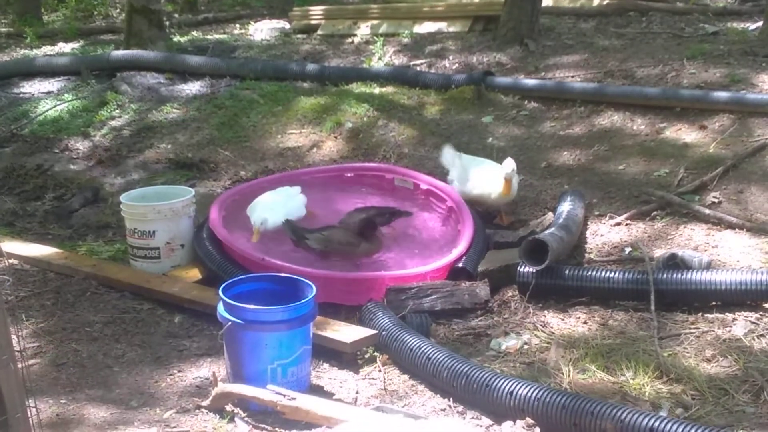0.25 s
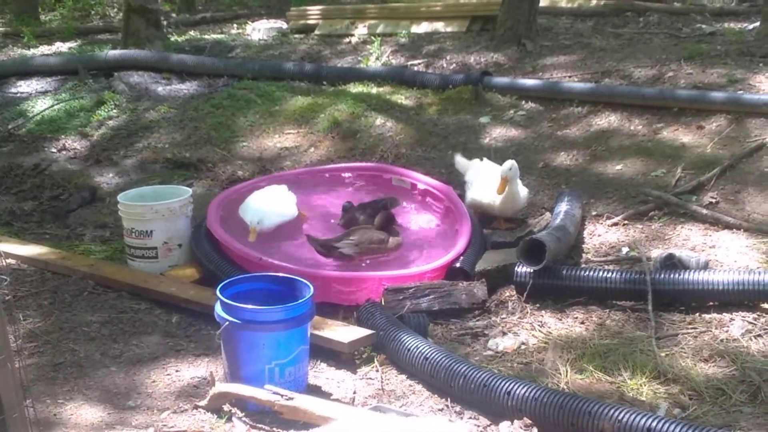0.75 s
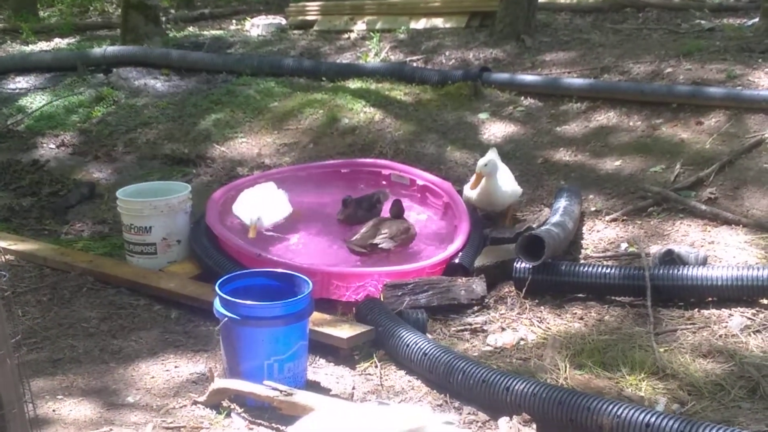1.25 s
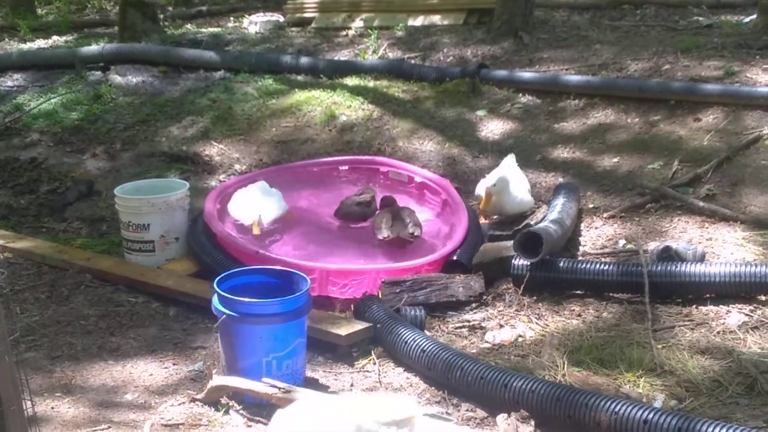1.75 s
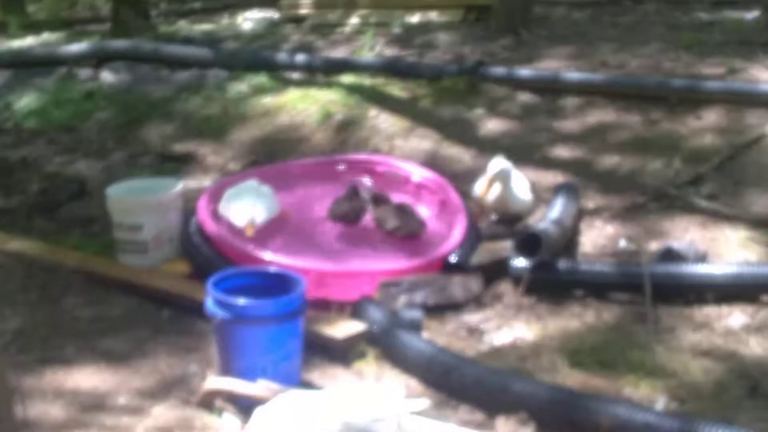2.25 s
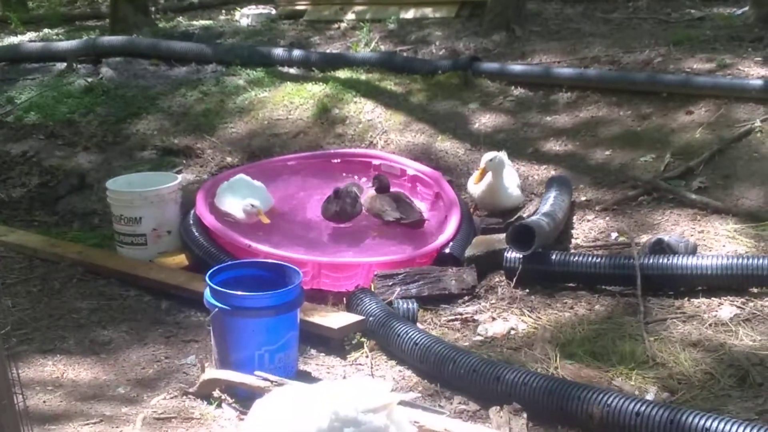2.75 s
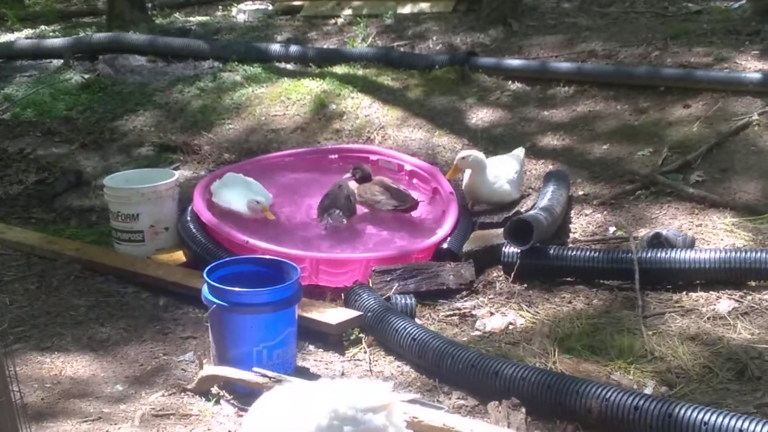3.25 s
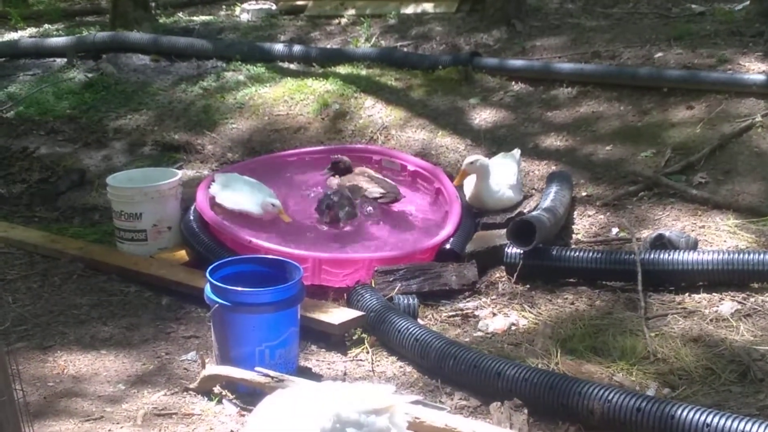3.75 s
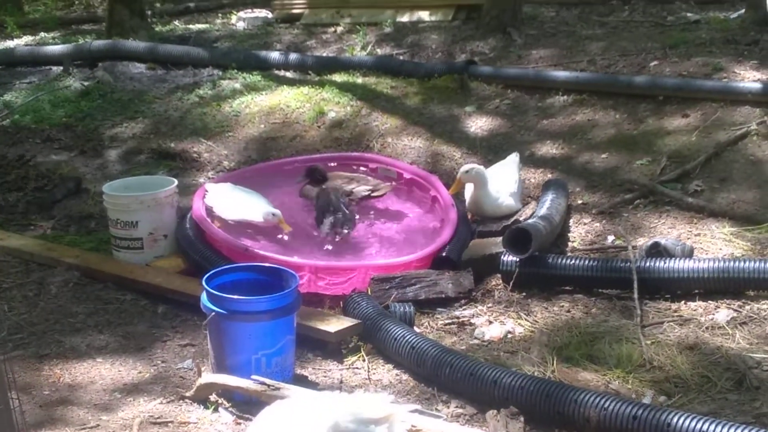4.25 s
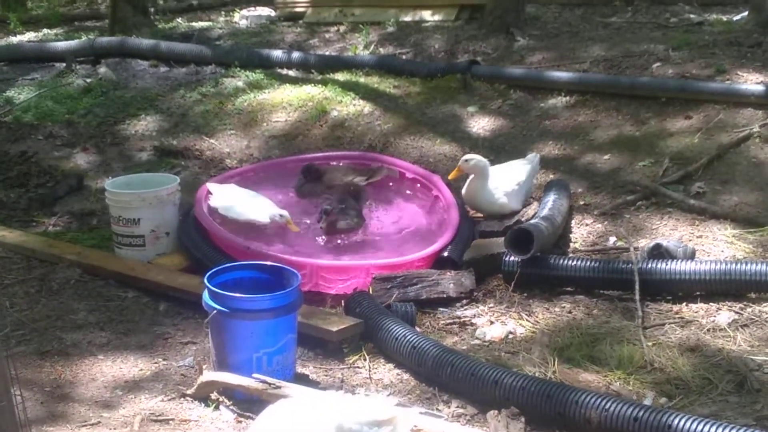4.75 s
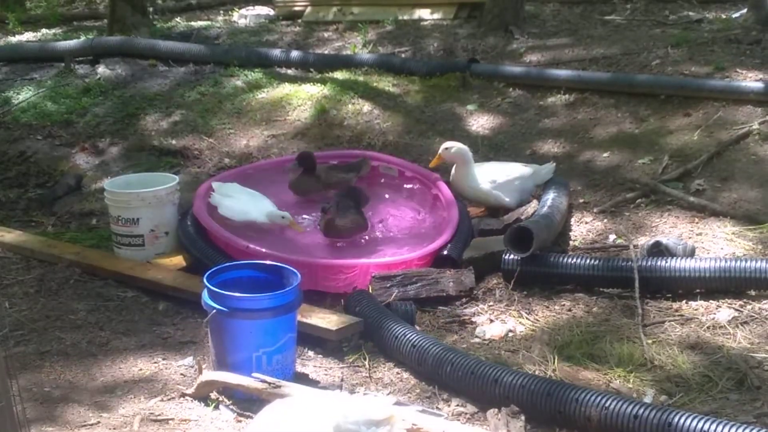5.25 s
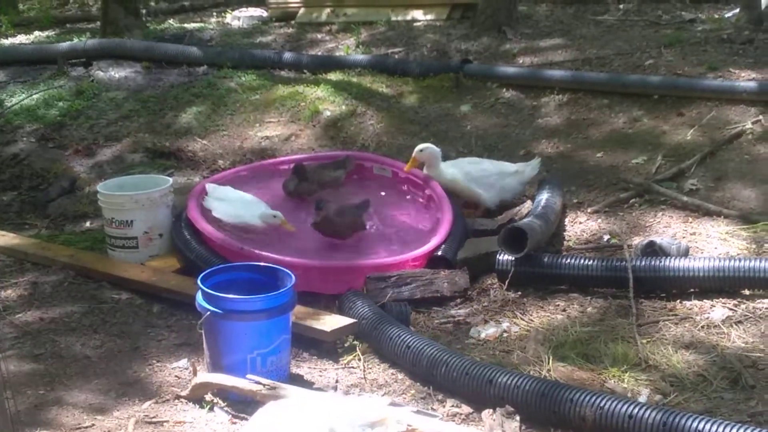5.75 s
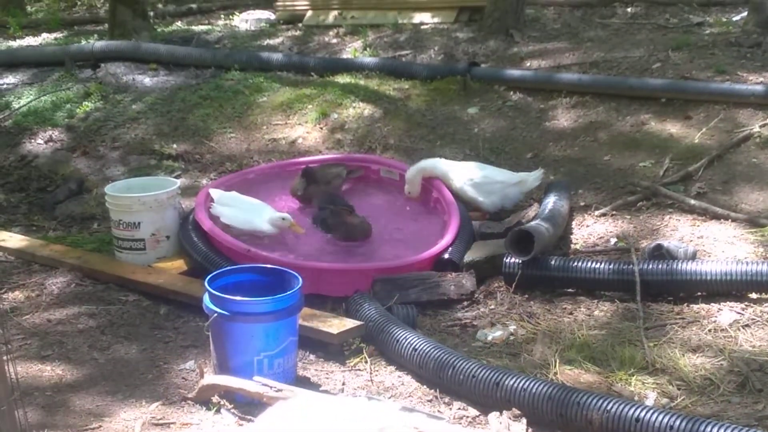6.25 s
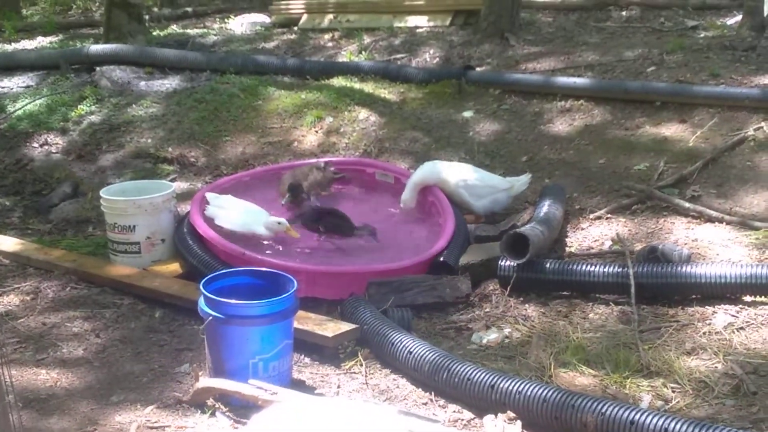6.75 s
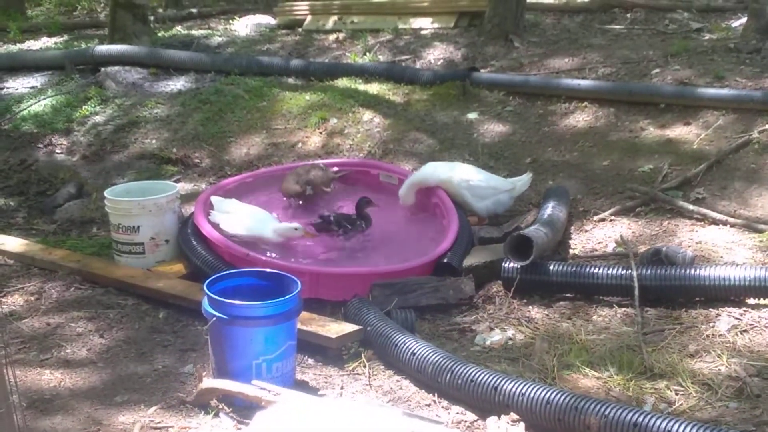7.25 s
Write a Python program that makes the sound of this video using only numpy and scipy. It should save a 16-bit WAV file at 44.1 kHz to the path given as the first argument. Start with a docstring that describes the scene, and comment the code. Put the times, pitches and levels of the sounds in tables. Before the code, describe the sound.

Ducks dabble and splash in a plastic pool outdoors while a bird gives two sharp, split-second yelps among soft trills, clucks and coos.

```python
"""Chicken and ducks in a shady pen

A chicken gives two sharp two-voiced yelps amid soft trills, squeaks, coos and clucks: pitch curves and
pulses through coloured filters. Ducks dabble in a plastic pool, flicking drops (rising bubbles, sprayed
noise) and bumping it once (damped modes). Ground, pen and trees return a faint echo; one far peep, dull
thuds, lapping and noise lie behind. The stereo microphone turns the phase between its channels with frequency."""
import sys
import numpy as np
from scipy import signal
from scipy.fft import rfft, irfft, next_fast_len
from scipy.io import wavfile
from scipy.ndimage import uniform_filter1d, map_coordinates

SR = 44100
rng = np.random.default_rng(int(sys.argv[2]) if len(sys.argv) > 2 else 0)


def file_out(sig):
    """Save sig as 16-bit WAV at sys.argv[1]."""
    # one column per channel
    cols = np.atleast_2d(sig).T
    # limit, then scale
    lim = np.clip(cols, -1, 1)
    pcm = np.round(lim * 32767).astype(np.int16)
    wavfile.write(sys.argv[1], SR, pcm)


N = 331632


def amp(db):
    """Decibels to gain."""
    return 10 ** (np.asarray(db) / 20)


def unit(x):
    """Scale to rms 1."""
    return x / np.sqrt(np.mean(x ** 2) + 1e-20)


def along(points, hz):
    """Interpolate (frequency, value) points on a log frequency axis."""
    point_hz, value = np.transpose(points)
    return np.interp(np.log(hz + 1), np.log(point_hz + 1), value)


def times(length_s):
    """Sample times of a span."""
    return np.arange(int(length_s * SR)) / SR


def cycle(hz):
    """Running phase of a pitch curve, in radians."""
    return 2 * np.pi * np.cumsum(hz) / SR


def add(track, start_s, x):
    """Mix x into the track from start_s."""
    room = track[..., max(round(start_s * SR), 0):][..., :x.shape[-1]]
    room += x[..., :room.shape[-1]]


def wobble(knots_per_s, size=N):
    """Smooth random curve through normally distributed knots."""
    knots = rng.standard_normal(int(size * knots_per_s / SR) + 4)
    return map_coordinates(knots, [np.arange(size) * knots_per_s / SR])


def filtered(x, response):
    """x times a complex response of frequency."""
    n = x.shape[-1]
    m = next_fast_len(n + 4096)
    return irfft(rfft(x, m) * response(np.fft.rfftfreq(m, 1 / SR)), m)[..., :n]


def coloured(x, spectrum):
    """x with a (frequency [Hz], level [dB]) colour, at rms 1."""
    return unit(filtered(x, lambda hz: amp(along(spectrum, hz))))


def resonate(x, spectrum, size=1024):
    """x through a causal, minimum-phase filter of the given (frequency [Hz], gain [dB]) colour."""
    cepstrum = irfft(np.log(amp(along(spectrum, np.fft.rfftfreq(size, 1 / SR)))))
    # fold onto positive time
    cepstrum[1:size // 2] *= 2
    cepstrum[size // 2 + 1:] = 0
    return signal.fftconvolve(x, irfft(np.exp(rfft(cepstrum))))


def patchy(depth_db):
    """Noise whose level varies in patches of time and frequency."""
    z = signal.stft(rng.standard_normal(N), nperseg=512)[2]
    field = uniform_filter1d(rng.standard_normal(z.shape), size=6, axis=0)
    field = uniform_filter1d(field, size=7, axis=1)
    return signal.istft(z * amp(depth_db * unit(field)), nperseg=512)[1][:N]


# Yelps: (break time [s], low voice [Hz], low voice level [dB], high voice level before, after break [dB],
# high voice left-right before, after break [dB])
YELP_EVENTS = [(2.2626, 871, -34.5, -16, -23.5, 6.5, -0.5), (4.7166, 884, -26, -33, -23, 3, 2)]
# Yelp gesture: (time from break [s], high voice [Hz], low voice level [dB], high voice level [dB])
YELP_GESTURE = [(-.028, 1310, -31, -48), (-.0235, 1422, -8, -29), (-.017, 1472, -22, -7.5),
                (-.011, 1583, -2.5, 0), (-.0045, 1686, -0.5, 1), (-.0005, 1830, -3, -15),
                (.0012, 2880, -7.5, -6), (.004, 3023, -23, -2), (.008, 3540, -24, -9),
                (.020, 3780, -46, -22)]
# Low voice overtones: (multiple, level [dB])
LOW_VOICE_OVERTONES = [(1, 3), (2, -1.5), (3, -15.5), (4, -5), (5, -27), (6, -27.5), (8, -18), (10, -25)]
# Yelp colour: (frequency [Hz], gain [dB])
YELP_COLOUR = [(300, -7), (700, -12), (900, -2), (1200, 4.5), (1600, -4), (1850, -5.5), (2150, 15.5),
               (2550, 5), (3050, 2.5), (3650, -9.5), (4300, 5), (5500, -24.5), (7000, -27.5), (12000, -22)]


def yelps(rough=0.11, coupling=0.17, jitter=0.048):
    """Each side of the syrinx has its own voice: one holds a low note, the other shoots upward."""
    out = np.zeros((2, N))
    when_s, *curves = np.transpose(YELP_GESTURE)
    t = when_s[0] + times(when_s[-1] - when_s[0])
    high_hz, low_swell_db, high_swell_db = [np.interp(t, when_s, c) for c in curves]
    for break_s, low_hz, level_db, before_db, after_db, pan_before_db, pan_after_db in YELP_EVENTS:
        low_gain = amp(level_db + low_swell_db)
        high_gain = amp(np.where(t < 0, before_db, after_db) + high_swell_db)
        pan_db = np.where(t < 0, pan_before_db, pan_after_db)
        low_phase = cycle(low_hz * (1 + jitter * wobble(947, len(t))))
        high_phase = cycle(high_hz * (1 + 0.014 * wobble(790, len(t))))

        low = np.zeros(len(t))
        for k, db in LOW_VOICE_OVERTONES:
            low += amp(db) * np.sin(k * low_phase) * (1 + rough * wobble(891, len(t)))
        low *= low_gain

        # shared airflow: the low voice modulates the high one and gates the rasp
        high = np.sin(high_phase) + amp(-23) * np.sin(2 * high_phase)
        high *= high_gain * (1 + coupling * np.sin(low_phase))
        air_spectrum = [(500, -24), (1500, 0.5), (4000, -6), (6000, 2), (12000, -23)]
        air = coloured(rng.standard_normal(len(t)), air_spectrum)
        rasp = amp(-16) * (low_gain + 0.25 * high_gain) * (1 + np.sin(low_phase)) * air

        voice = low + rasp + high * amp(np.outer([0.5, -0.5], pan_db))
        voice = np.array([resonate(side, YELP_COLOUR) for side in voice])
        add(out, break_s + when_s[0], np.sqrt(2) * voice)
    return out


def whistle(pitch_hz, overtone_db=-21, shimmer=0.31, jitter=0.025,
            flare_hz=1620, width_hz=240, boost_db=6, fade_s=0.0036):
    """Slightly hoarse tone of rms 1 that flares as its pitch sweeps through flare_hz."""
    n = len(pitch_hz)
    phase = cycle(pitch_hz * (1 + jitter * wobble(386, n)))
    flare = amp(boost_db * np.exp(-((pitch_hz - flare_hz) / width_hz) ** 2))
    fade = signal.windows.tukey(n, 2 * fade_s * SR / n)
    swell = flare * fade * (1 + shimmer * wobble(295, n))
    return unit(swell * (np.sin(phase) + amp(overtone_db) * np.sin(2 * phase)))


# Trills: (time of first flick's top [s], flicks, flick period [s],
# opening level [dB], closing level [dB], rasp level [dB]); levels before gains
TRILL_EVENTS = [(.726, 3, 0.056, -57, -51, -61), (1.515, 4, 0.052, -58, -45.5, -58.5),
                (2.763, 3, 0.055, -57, -56, -55), (3.592, 3, 0.053, -45.5, -47, -51.5),
                (5.200, 3, .052, -56, -51, -54), (6.115, 3, 0.052, -59, -51, -54.5)]
TRILL_HZ, FLICK_HZ, FLICK_SHARPNESS = 1307, 2450, 3  # held note, top of a flick, exponent
LEAD_S, TAIL_S = 0.078, 0.021  # before the first flick's top, after the last


def trills(gain_db=-1, flick_db=-4, fall_db=-12):
    """A held note breaks into evenly spaced upward flicks; the level dips at the top of each flick."""
    out = np.zeros(N)
    for flick_s, flicks, period_s, open_db, close_db, _ in TRILL_EVENTS:
        t = times(LEAD_S + (round(flicks) - 1) * period_s + TAIL_S) - LEAD_S
        turn = np.maximum(t / period_s, -0.5) % 1
        lift = np.abs(2 * turn - 1) ** FLICK_SHARPNESS
        db = gain_db + np.linspace(open_db, close_db, len(t)) + flick_db * lift
        db += fall_db * np.clip(1 - (t[-1] - t) / TAIL_S, 0, 1)
        pitch_hz = TRILL_HZ + (FLICK_HZ - TRILL_HZ) * lift
        add(out, flick_s - LEAD_S, amp(db) * whistle(pitch_hz))
    return out


# Squeaks: (time [s], length [s], start [Hz], end [Hz], level before gain_db [dB])
SQUEAK_EVENTS = [(1.415, 0.017, 1330, 850, -54.5), (2.16, 0.025, 1120, 694, -49.5),
                 (2.906, 0.013, 1280, 740, -53.5), (3.92, 0.011, 1365, 850, -54),
                 (4.888, 0.0074, 1470, 2660, -43), (4.978, 0.0065, 1150, 1750, -47.5),
                 (5.148, .024, 1380, 3290, -46.5), (6.164, 0.0087, 1450, 1720, -42.5),
                 (6.442, 0.018, 1530, 2090, -44)]


def squeaks(gain_db=-2.5):
    """Quick straight pitch glides, up or down."""
    out = np.zeros(N)
    for start_s, length_s, start_hz, end_hz, db in SQUEAK_EVENTS:
        pitch_hz = np.linspace(start_hz, end_hz, len(times(length_s)))
        add(out, start_s, amp(db + gain_db) * whistle(pitch_hz))
    return out


# Coos: (time [s], length [s], top pitch [Hz], level before gain_db [dB])
COO_EVENTS = [(1.372, .05, 1730, -59), (2.706, .042, 967, -45), (3.96, 0.065, 944, -46),
              (5.115, .04, 1034, -47.5), (5.132, 0.053, 657, -48.5), (6.185, .055, 872, -49),
              (6.239, 0.092, 789, -54.5), (6.366, 0.036, 752, -57)]


def coos(gain_db=-2.0, droop=0.319, rough=0.052):
    """Low, hoarse notes that arch up to their top pitch and sink again."""
    out = np.zeros(N)
    for start_s, length_s, top_hz, db in COO_EVENTS:
        u = np.linspace(-1, 1, len(times(length_s)))
        tone = whistle(top_hz * (1 - droop * u ** 2), jitter=rough)
        add(out, start_s, amp(db + gain_db) * unit(np.sqrt(1 - u ** 2) * tone))
    return out


# Clucks: (time [s], length [s], chest level [dB], beak level before beak_gain_db [dB])
CLUCK_EVENTS = [(0.556, 0.1, -58, -62), (1.179, 0.027, -53, -57), (1.751, 0.054, -56.5, -53),
                (2.12, .029, -53.5, -49), (2.485, .02, -50.5, -54.5), (2.666, 0.015, -49, -52),
                (2.84, 0.024, -49, -51.5), (3.07, 0.077, -55, -62), (3.489, 0.03, -46.5, -47),
                (3.658, 0.035, -44.5, -43), (3.88, .013, -46, -51.5), (4.435, .015, -48, -52.5),
                (4.534, 0.036, -52.5, -51.5), (4.748, .028, -44.5, -48), (5.008, 0.029, -49.5, -56),
                (5.19, 0.011, -45.5, -48.5), (5.478, .022, -52.5, -53), (5.988, 0.015, -51, -61),
                (6.283, 0.013, -46, -61), (6.331, .02, -45.5, -70), (6.451, 0.028, -51.5, -49),
                (7.081, 0.012, -48.5, -57), (7.434, 0.022, -53, -50.5)]
# Chest cavity: (frequency [Hz], gain [dB])
CHEST_GAIN = [(60, -32), (130, 9.5), (190, 0), (300, 6), (450, -6), (700, -7.5), (1500, -50.5)]
# Beak cavity: (frequency [Hz], gain [dB])
BEAK_GAIN = [(250, -24), (550, -4), (800, 3), (1100, 1.5), (1400, 0), (2000, -14), (3200, -19),
             (5000, -36.5), (10000, -51)]
# Hoarse opening of a trill: start before first flick's top, length, chest against the trill's rasp level
RASP_LEAD_S, RASP_S, RASP_CHEST_DB = 0.072, 0.076, -19
FAINT_CLUCK_S, FAINT_CHEST_DB, FAINT_BEAK_DB = 0.038, -68, -59.5  # rest of the flock


def clucks(pulse_hz=250, jitter=0.192, air=0.1, beak_gain_db=1.0, faint_count=10):
    """Abrupt runs of uneven pulses ring chest and beak: clear clucks, faint ones, the rasps that open trills."""
    out = np.zeros(N)
    rasps = [(flick_s - RASP_LEAD_S, RASP_S, db + RASP_CHEST_DB, db) for flick_s, *_, db in TRILL_EVENTS]
    faint = []
    for k, place in enumerate(rng.random(faint_count)):
        start_s = (k + place) / faint_count * N / SR
        faint.append((start_s, FAINT_CLUCK_S, FAINT_CHEST_DB, FAINT_BEAK_DB))
    for start_s, length_s, chest_db, beak_db in CLUCK_EVENTS + rasps + faint:
        t = times(length_s)
        n = len(t)
        turns = np.cumsum(pulse_hz * np.exp(jitter * wobble(150, n))) / SR
        pulses = np.diff(np.floor(turns + 0.5), prepend=0) * amp(4.1 * wobble(190, n))
        swell = np.minimum(t / 0.0019, 1) * np.minimum(3 * (1 - t / length_s), 1)
        source = (pulses + air * rng.standard_normal(n)) * swell
        for cavity, db in ((CHEST_GAIN, chest_db), (BEAK_GAIN, beak_db + beak_gain_db)):
            ring = resonate(source, cavity)
            add(out, start_s, amp(db) * ring * np.sqrt(n / np.sum(ring ** 2)))
    return out


# Spray colour: (frequency [Hz], level [dB])
SPRAY_SPECTRUM = [(500, -22.5), (2000, 5.5), (3000, 6.5), (3900, 7), (5000, -19.5), (9500, -24),
                  (14000, -44.5)]


def bubble(hz, t60_s, rise_per_s, tick_db=-9):
    """A drop ticks on the surface; the bubble it traps rings and rises in pitch."""
    t = times(0.029)
    pitch_hz = hz * (1 + rise_per_s * (np.minimum(t, 0.012) - 0.003))
    ring = np.sin(cycle(pitch_hz)) * amp(-60 * t / t60_s) * (1 - np.exp(-t / 0.001))
    tick_gain = amp(tick_db - 60 * t / 0.027) * (1 - np.exp(-t / 0.0014))
    return ring + tick_gain * coloured(rng.standard_normal(len(t)), SPRAY_SPECTRUM)


# Loudest drops: (time [s], level before drop_gain_db [dB], bubble pitch 3 ms in [Hz])
DROP_EVENTS = [(1.7913, -47, 3800), (3.3222, -39, 2830), (3.4037, -44.5, 2660), (3.4767, -44, 2870),
               (4.0572, -39, 2480), (4.1702, -43, 3530), (4.194, -46, 3360), (4.31, -44.5, 3540),
               (4.3687, -38.5, 3720), (4.928, -46, 3530), (5.2976, -40.5, 2890), (5.3665, -39.5, 3450),
               (5.386, -41, 2840), (5.474, -43, 3050), (5.5773, -37.5, 3440), (5.7319, -42.5, 2740),
               (6.0015, -50, 2520)]
# Splashes of bills and wings: (time [s], level before attack and decay [dB], t60 [s])
SPLASH_EVENTS = [(0.556, -56, 0.42), (.585, -52, 0.25), (0.756, -50, 0.059), (4.029, -52, 0.044),
                 (4.514, -42, 0.066), (4.888, -47.5, 0.037), (5.017, -43, 0.073), (5.623, -38.5, 0.1),
                 (5.758, -39.5, 0.07), (6.163, -45, 0.071)]
# Stirring of the water: (time [s], slosh level [dB], trickle level [dB]); before gains, also in lapping()
STIRRING = [(0.0, -64.5, -76.5), (0.86, -60.5, -68), (1.34, -59.5, -70), (2.16, -62, -69),
            (2.39, -56, -63.5), (2.68, -56, -63), (3.14, -60, -64), (3.41, -55, -61), (3.56, -54, -61.5),
            (3.77, -55, -63.5), (4.75, -57.5, -62), (4.92, -56, -61.5), (5.95, -57.5, -63.5),
            (6.24, -53.5, -63), (6.47, -57, -65), (7.52, -61.5, -66)]


def water(drop_gain_db=7, drip_count=260):
    """Single drops, many small ones at random times, louder where the water is stirred, and splashed spray."""
    out = np.zeros(N)
    for start_s, db, hz in DROP_EVENTS:
        add(out, start_s, amp(db + drop_gain_db) * bubble(hz, t60_s=0.015, rise_per_s=14))
    for start_s, db, t60_s in SPLASH_EVENTS:
        t = times(0.25)
        noise = rng.standard_normal(len(t)) * amp(5 * wobble(500, len(t)))
        envelope = amp(db - 60 * t / t60_s) * (1 - np.exp(-t / 0.0013))
        add(out, start_s, envelope * coloured(noise, SPRAY_SPECTRUM))
    when_s, _, trickle_db = np.transpose(STIRRING)
    for place, pitch, size in rng.random((drip_count, 3)):
        start_s = place * N / SR
        busy_db = np.interp(start_s, when_s, trickle_db) - trickle_db.max()
        drip_db = busy_db - 60 + 14 * size ** 2
        drip = bubble(2200 + 1500 * pitch, t60_s=0.022, rise_per_s=20)
        add(out, start_s, amp(drip_db) * drip)
    return out


# Knocks of the bump: (time [s], level [dB])
KNOCKS = [(5.629, -33), (5.636, -34.5), (5.676, -42.5)]
# Plastic shell modes: (frequency [Hz], level [dB], t60 [s])
SHELL_MODES = [(188, -11, 0.093), (320, -3, 0.099), (483, -6.5, 0.15), (617, -7, 0.062), (883, -5.5, 0.049),
               (1245, -8.5, 0.027)]


def pool():
    """A duck bumps the plastic shell, whose modes the water damps."""
    out, t = np.zeros(N), times(0.28)
    for start_s, db in KNOCKS:
        ring = np.zeros(len(t))
        for hz, mode_db, t60_s in SHELL_MODES:
            decay = amp(mode_db + rng.normal(0, 1.5) - 60 * t / t60_s)
            ring += decay * np.sin(2 * np.pi * hz * t + rng.uniform(0, 2 * np.pi))
        add(out, start_s, amp(db) * ring * (1 - np.exp(-t / 0.00029)))
    return out


def far_bird(start_s=7.468, length_s=0.035, start_hz=5050, end_hz=4900, db=-69):
    """A small bird in the trees gives one thin, slightly falling peep."""
    out, n = np.zeros(N), len(times(length_s))
    peep = np.sin(cycle(np.linspace(start_hz, end_hz, n))) * np.hanning(n)
    add(out, start_s, amp(db) * unit(peep))
    return out


# Tree echo decay: (frequency [Hz], t60 [s])
TREE_T60 = [(200, 1), (900, 0.31), (1600, 0.43), (3500, 0.53), (10000, 0.45)]
# Nearby reflections: (delay [s], level [dB])
REFLECTIONS = [(0.0107, -29), (.019, -25), (.046, -22.5)]


def echo(x, early_db=-21, late_db=-21):
    """Ground and pen answer with a short noise tail, the trees with a longer one that decays by frequency."""
    hz, frame_s, z = signal.stft(rng.standard_normal((2, SR // 2)), SR, nperseg=256)
    decay = amp(-60 * frame_s / along(TREE_T60, hz)[:, None])
    late = signal.istft(z * decay, SR, nperseg=256)[1]
    t = np.arange(late.shape[1]) / SR
    early = rng.standard_normal(late.shape) * amp(-60 * t / 0.15)
    tail = (amp(early_db) * unit(early) + amp(late_db) * unit(late)) * (t > 0.004) / np.sqrt(len(t))
    tail = tail[0] + 0.87 * np.array([tail[1], -tail[1]])  # mid and side: channels share part of the tail
    for delay_s, db in REFLECTIONS:
        tail[:, round(delay_s * SR)] += amp(db)
    return signal.fftconvolve(x[None], tail, axes=1)[:, :N]


# Slosh colour: (frequency [Hz], level [dB])
SLOSH_SPECTRUM = [(60, 7.5), (130, -0.5), (300, 1.5), (520, -4), (820, 0), (1300, -7.5), (1900, -11.5),
                  (2600, -26), (5000, -36.5), (14000, -44)]
# Trickle colour: (frequency [Hz], level [dB])
TRICKLE_SPECTRUM = [(800, -28), (2000, 5.5), (2800, 1), (3600, 3), (4300, -5), (5200, -12.5), (6500, -19.5),
                    (8200, -21), (9300, -16), (11000, -26.5), (14000, -26)]


def lapping(slosh_gain_db=1.83, trickle_gain_db=3.5):
    """Stirred water sloshes and trickles all along: two patchy noises that follow the stirring."""
    when_s, *levels = np.transpose(STIRRING)
    slosh_db, trickle_db = [np.interp(np.arange(N) / SR, when_s, c) for c in levels]
    slosh_gain = amp(slosh_db + slosh_gain_db + 1.3 * wobble(25))
    slosh = slosh_gain * coloured(patchy(depth_db=2.5), SLOSH_SPECTRUM)
    trickle_gain = amp(trickle_db + trickle_gain_db + 0.23 * wobble(30))
    return slosh + trickle_gain * coloured(patchy(depth_db=3.0), TRICKLE_SPECTRUM)


# Thuds: (time [s], length [s], frequency [Hz], level [dB])
THUD_EVENTS = [(2.979, 0.11, 73.3, -41), (2.999, 0.031, 122, -53)]


def thuds():
    """Dull thuds somewhere in the yard: low sines under a bell-shaped envelope."""
    out = np.zeros(N)
    for start_s, length_s, hz, db in THUD_EVENTS:
        t = times(length_s)
        add(out, start_s, amp(db) * unit(np.sin(2 * np.pi * hz * t) * np.hanning(len(t))))
    return out


# Rumble colour: (frequency [Hz], level [dB])
RUMBLE_SPECTRUM = [(20, -34), (35, -44), (50, -3), (70, 0), (100, -3.5), (140, -19), (300, -39.5),
                   (900, -83)]
# Colour of each channel's own noise: (frequency [Hz], level [dB])
HISS_SPECTRUM = [(30, -8), (60, 24), (130, -5), (300, 25.5), (700, 12), (3000, 9), (5500, -0.5),
                 (9500, -4.5), (13500, -9)]


def microphone_floor(rumble_db=-57, hiss_db=-66):
    """Low air rumble, nearly opposite in phase between the channels after record(), and each channel's noise."""
    rumble_gain = amp(rumble_db + 1.3 * wobble(8.4))
    rumble = rumble_gain * coloured(rng.standard_normal(N), RUMBLE_SPECTRUM)
    hiss_gain = amp(hiss_db + 2.6 * wobble(10))
    return rumble + hiss_gain * coloured(rng.standard_normal((2, N)), HISS_SPECTRUM)


def scene():
    """Birds and pool with their echo, over lapping, thuds and microphone noise."""
    birds = yelps() + trills() + squeaks() + coos() + clucks()
    near = birds + water() + pool() + far_bird()
    return near + echo(near.mean(axis=0)) + lapping() + thuds() + microphone_floor()


# Microphone phase: (frequency [Hz], lead of left over right [rad])
PHASE_LEAD = [(80, -2.8), (125, -2.3), (170, -.5), (250, 0), (1150, -.25), (1600, -1.45), (2050, -3.1),
              (2400, -3.8), (2700, -6.5), (3350, -6.1), (4200, -3.2), (4700, -2.6), (5100, -.2),
              (5650, -.1), (6200, -3.1), (7100, -.3), (7700, 0), (8200, -2.4), (9300, -.6), (10400, -2.2),
              (11400, -.5), (12500, -2), (14000, -1)]
# Microphone balance: (frequency [Hz], left-right [dB])
BALANCE = [(60, 2), (150, -1.6), (400, -1.8), (900, -.5), (1550, 2), (2200, .3), (2900, 0), (3550, 2.5),
           (4300, 0), (6000, 0), (9000, -1.3), (13000, -2)]
TOP_HZ = 14200


def record(dry):
    """The microphone turns phase and balance between the channels; nothing passes from TOP_HZ up."""
    sides = np.array([[0.5], [-0.5]])

    def response(hz):
        """Half of each difference goes to each channel, with opposite signs."""
        return np.exp(1j * sides * along(PHASE_LEAD, hz)) * amp(sides * along(BALANCE, hz))

    return filtered(filtered(dry, response), lambda hz: hz < TOP_HZ)


dry = scene()
out = record(dry)
file_out(out)
```